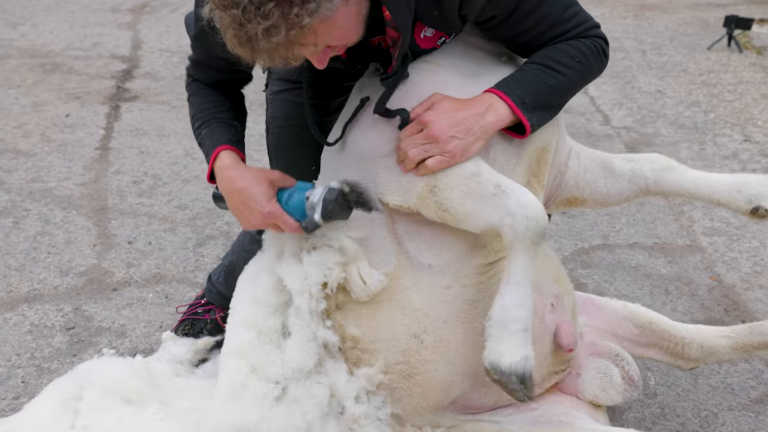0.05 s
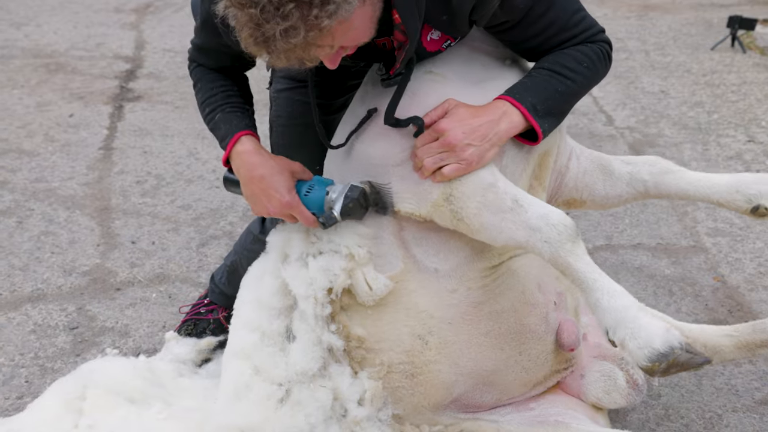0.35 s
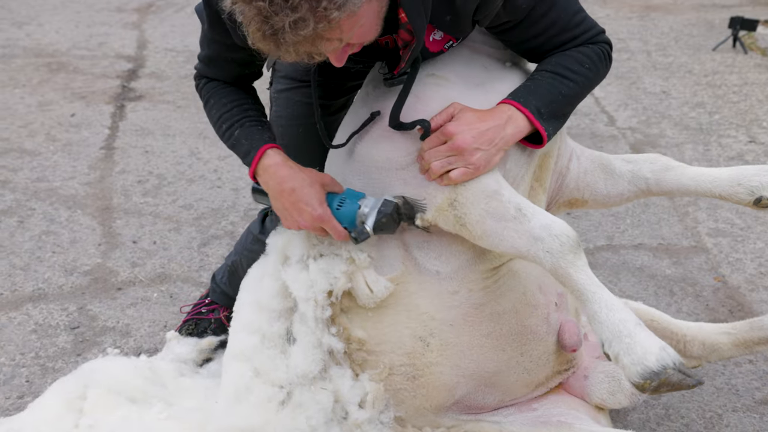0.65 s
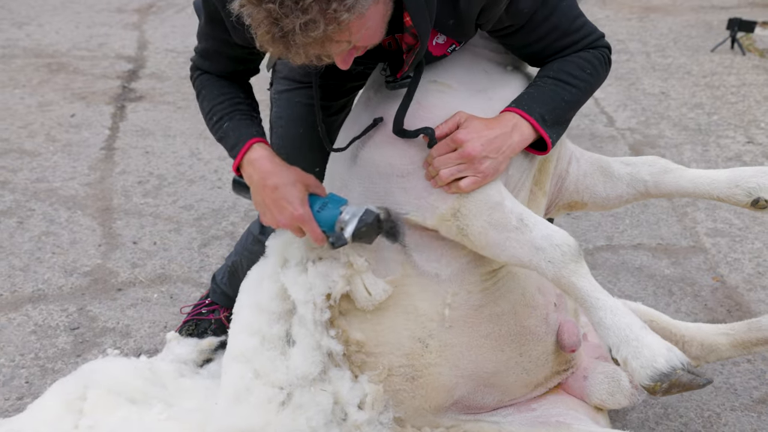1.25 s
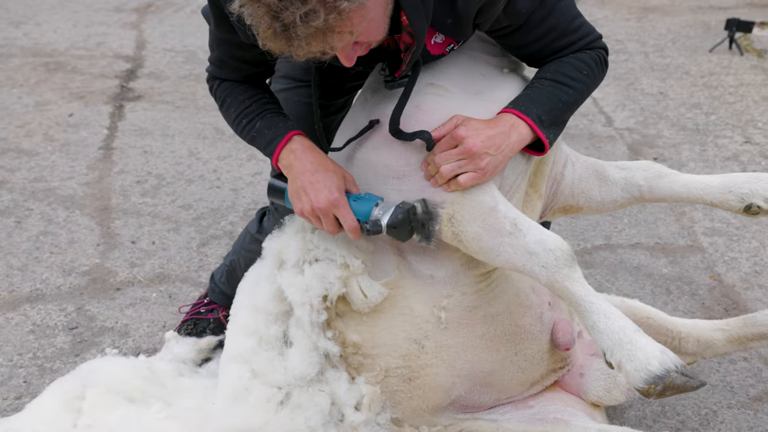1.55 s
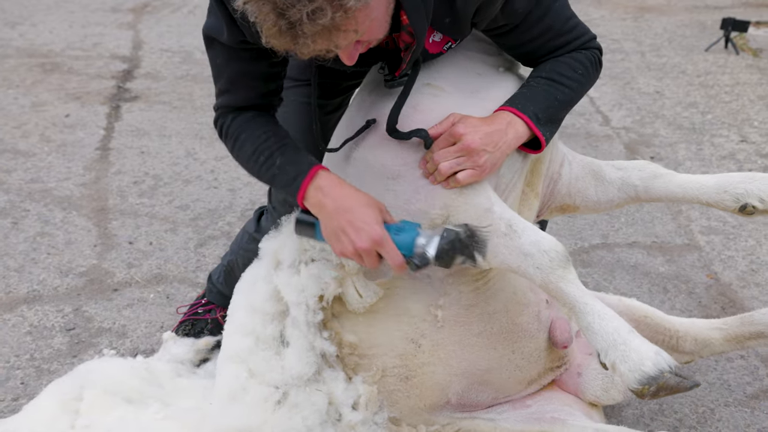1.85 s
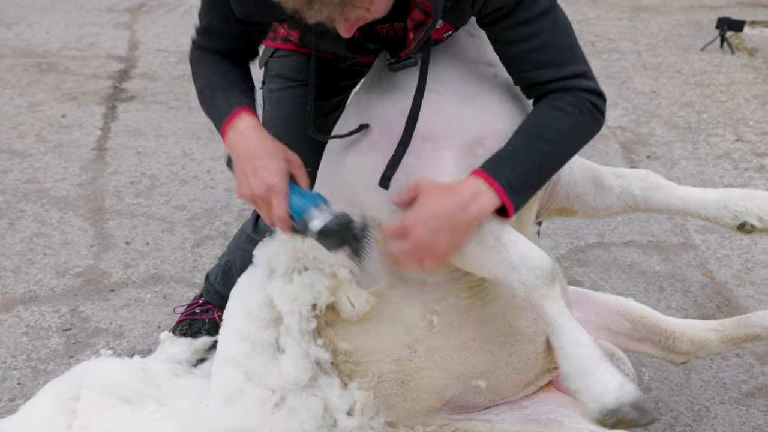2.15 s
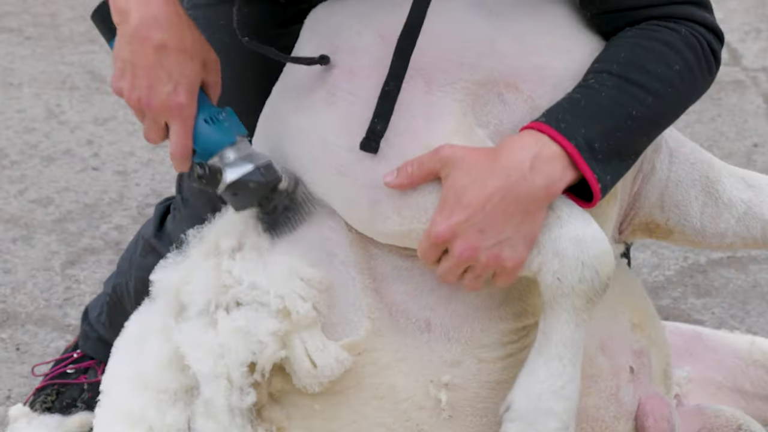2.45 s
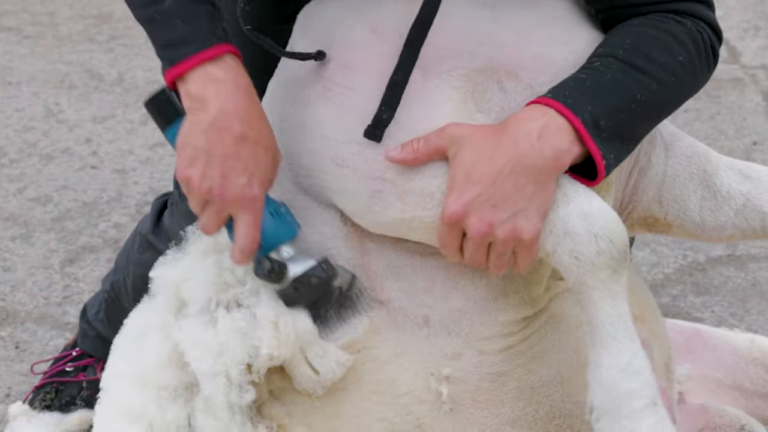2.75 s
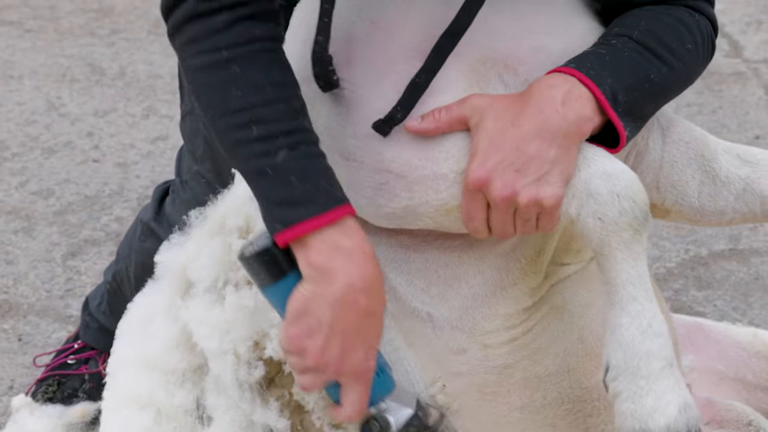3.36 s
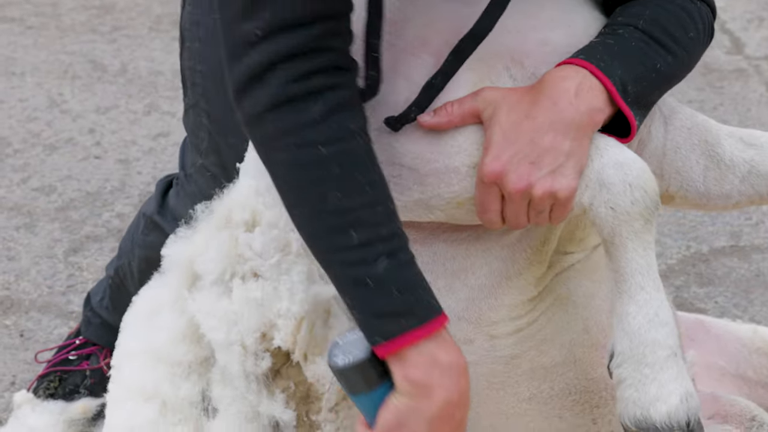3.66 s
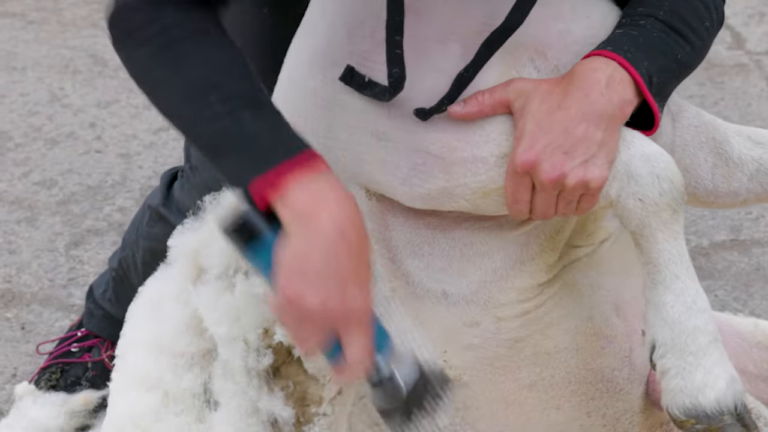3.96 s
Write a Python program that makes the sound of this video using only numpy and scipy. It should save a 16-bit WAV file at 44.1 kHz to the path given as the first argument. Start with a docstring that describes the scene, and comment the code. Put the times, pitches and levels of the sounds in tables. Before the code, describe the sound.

Close-up electric shears run continuously through a sheep's wool, with a fast rattle, a hissing rasp and a wavering whine over faint open air. Near the end the buzz turns duller and quieter in thick fleece.

```python
"""Outdoors on paving, one microphone close to electric clippers shearing a sheep.
The cutter swings to and fro about 39 times a second: it knocks the housing and clicks at each turn, and
rasps over the comb in between, snipping wool, while the gears whine. The animal shifts with soft thuds
over faint open air. Late on the cutter sinks into thick fleece, which muffles it and slows the motor."""
import sys
import numpy as np
from scipy import signal
from scipy.fft import rfft, irfft
from scipy.io import wavfile
from scipy.ndimage import map_coordinates

SR = 44100
rng = np.random.default_rng(int(sys.argv[2]) if len(sys.argv) > 2 else 0)


def wav_out(sig):
    """Save sig, one row per channel (or a flat mono array), as 16-bit PCM at SR to the path in sys.argv[1]."""
    wavfile.write(sys.argv[1], SR, np.round(np.clip(np.atleast_2d(sig).T, -1, 1) * 32767).astype(np.int16))


N = 176400
TIME = np.arange(N) / SR

# motor speed: (time [s], stroke rate [Hz])
STROKE_RATE = [(0.0, 39.15), (0.2, 39.18), (0.6, 39.27), (1.0, 39.14), (1.3, 39.46), (1.65, 38.95),
               (2.05, 39.23), (2.35, 39.2), (2.8, 38.93), (3.0, 38.42), (3.3, 38.12), (3.5, 37.86),
               (3.64, 37.6), (3.8, 39.56), (4.0, 39.53)]
# the cutter's two turns: (place in the stroke [0-1], push on the housing [relative], click trim [dB])
CUTTER_TURNS = [(.175, 1.0, -1.5), (.67, -.45, 0.5)]


def from_db(db):
    """Decibels to gain."""
    return 10 ** (np.asarray(db) / 20)


def rms_one(x):
    """Scale to unit rms."""
    return x / np.sqrt(np.mean(x ** 2) + 1e-20)


def in_time(rows):
    """Read a (time, value) curve at every sample."""
    return np.interp(TIME, *np.transpose(rows))


def at_hz(points, hz):
    """Read a spectrum on a log-frequency axis."""
    f, value = np.transpose(points)
    return np.interp(np.log(hz), np.log(f), value)


def drift(rate_hz):
    """A smooth random wander of about unit rms, mostly slower than rate_hz."""
    hop, settle = 40, 2000
    r = np.exp(-2 * np.pi * rate_hz * hop / SR)
    slow = signal.lfilter([1], [1, -2 * r, r * r], rng.standard_normal(N // hop + settle + 2))[settle:]
    return np.interp(np.arange(N) / hop, np.arange(len(slow)), rms_one(slow))


def stroke_gains(spread_db):
    """Random gains, more than enough for one a stroke."""
    return from_db(spread_db * rng.standard_normal(N // 100))


def resonate(x, hz, width_hz):
    """A resonance with gain 1 at its peak."""
    r = np.exp(-np.pi * width_hz / SR)
    poles = [1, -2 * r * np.cos(2 * np.pi * hz / SR), r * r]
    return signal.lfilter(np.array([1, 0, -1]) * (1 - r * r) / 2, poles, x)


def ring(drive, hz, width_hz):
    """The same resonance twice over, for steeper sides, at unit rms."""
    return rms_one(resonate(resonate(drive, hz, width_hz), hz, width_hz))


def around(s, spread_s):
    """A bell-shaped rise and fall around a moment."""
    return np.exp(-((TIME - s) / spread_s) ** 2 / 2)


def swell(drive, s, spread_s, hz, width_hz, db):
    """A resonance that fades in and out around a moment."""
    return from_db(db) * around(s, spread_s) * ring(drive, hz, width_hz)


def housing_knocks(strokes):
    """The cutter pushes the housing one way, then the other; its modes ring and the whole tool shakes."""
    # housing modes: (frequency [Hz], width [Hz], trim [dB], level curve [0 low, 1 middle, 2 upper])
    modes = [(236, 110, -25.5, 2), (269, 53, -18.5, 0), (344, 29, -5, 0), (414.3, 48, -1.5, 1),
             (493.6, 138, -4.5, 2), (880, 54, -11.5, 2)]
    # the housing's ring, changing as the wool presses on it: (time [s], level [dB])
    low = [(0.0, -52), (0.54, -47.5), (0.91, -41), (1.15, -46), (1.47, -41.5), (1.93, -44), (3.44, -43.5),
           (3.84, -51), (4.0, -46)]
    middle = [(0.0, -51), (0.59, -53), (0.93, -47), (2.08, -46), (2.14, -40.5), (2.73, -45), (3.58, -64.5),
              (3.62, -71), (3.75, -47.5), (4.0, -46.5)]
    upper = [(0.0, -41.5), (1.44, -44), (2.06, -47), (2.15, -45.5), (3.05, -45.5), (3.8, -56.5),
             (3.95, -46), (4.0, -47)]
    # shaking at the stroke rate: (time [s], level [dB])
    shake = [(0.0, -76), (0.36, -67), (1.7, -67), (2.17, -87), (2.28, -71), (3.14, -83), (4.0, -87)]
    low_hz, high_hz = 192, 584
    pushes = np.zeros(N + 1)
    for place, push, _ in CUTTER_TURNS:
        turns = np.arange(int(strokes[-1] - place) + 1) + place
        times = np.interp(turns, strokes, TIME)
        pushes[(times * SR).astype(int)] += push * stroke_gains(spread_db=.67)[:len(times)]
    pushes = signal.sosfilt(signal.butter(2, low_hz, "high", fs=SR, output="sos"), pushes[:N] + 1e-18)
    pushes = signal.sosfilt(signal.butter(4, high_hz, fs=SR, output="sos"), pushes)
    out = from_db(in_time(shake)) * rms_one(np.sin(2 * np.pi * strokes))
    for hz, width, db, curve in modes:
        level = in_time((low, middle, upper)[curve])
        out += from_db(level + db) * rms_one(resonate(pushes, hz, width))
    return out


def gear_whine(strokes):
    """Rough gear and motor tones, locked to the stroke and swelling with the load on each swing."""
    # three gear tones, then the motor's overtone: (multiple of the stroke rate, trim [dB], place of the
    # swell [0-1], swell depth [0-1], lopsidedness [0-1], phase wobble [rad], roughness [0-1])
    tones = [(37, -3.5, 0.95, 0.8, 0.4, 0.28, 0.12), (52, -3, 0.87, 0.75, 0.0, 0.38, 0.25),
             (104, 0, 0.84, 0.5, 0.45, 0.45, 0.28), (23, 2, .7, .5, .5, .2, .15)]
    # strength of those four tones: (time [s], level [dB])
    low = [(0.0, -42.5), (0.15, -37.5), (.55, -38.5), (1.01, -46.5), (1.301, -38.5), (1.7, -41), (1.8, -49),
           (2.04, -46.5), (2.27, -39), (2.8, -45), (3.44, -52.5), (4.0, -46)]
    middle = [(0.0, -38.5), (0.62, -35), (0.75, -38.5), (1.54, -35), (1.95, -44), (2.03, -35), (2.08, -47),
              (2.33, -33.5), (2.5, -39), (2.75, -64), (3.13, -43.5), (3.5, -56), (3.72, -43), (3.84, -62),
              (4.0, -40.5)]
    high = [(0, -39), (.06, -53), (.15, -34.5), (.24, -46), (.5, -51), (.68, -43), (.86, -37.5),
            (1.02, -45), (1.12, -39), (1.27, -50), (1.42, -35), (1.6, -35.5), (1.78, -45), (1.97, -43.5),
            (2.08, -45), (2.15, -34.5), (2.26, -45), (2.4, -37), (2.56, -44), (2.7, -48), (2.86, -40.5),
            (3.22, -48.5), (3.33, -63), (3.55, -54), (3.74, -53), (3.86, -45), (4, -42.5)]
    motor = [(0, -62), (2.0, -57), (2.35, -51), (2.9, -53), (3.3, -58), (4, -60)]
    wobble_hz, chatter_hz = 16, 40
    out = 0
    for row, level in zip(tones, (low, middle, high, motor)):
        multiple, db, place, depth, lopsided, wobble, rough = row
        angle = 2 * np.pi * (strokes - place)
        load = 1 + depth * np.cos(2 * angle) + lopsided * np.cos(angle)
        mesh = 2 * np.pi * multiple * strokes + wobble * drift(wobble_hz)
        tone = np.sin(mesh) * (1 + rough * drift(chatter_hz))
        tone += np.cos(mesh) * rough * drift(chatter_hz)
        out += from_db(in_time(level) + db) * rms_one(load * tone)
    return out


def blade_force(strokes):
    """Force between the blades: sliding friction and a sharp click at each turn."""
    # blade friction: (place in the stroke [0-1], relative level [dB])
    friction = [(0, -3), (.1, -7), (.18, 2), (.3, 0), (.41, 2), (.52, -.5), (.62, -3.5), (.7, 3),
                (.85, 1.5)]
    click_db, click_decay_s, lead_strokes = 7.5, .00041, .034
    wander_db = .42 * drift(rate_hz=23)
    force = from_db(np.interp(strokes, *np.transpose(friction), period=1) + wander_db)
    for place, _, db in CUTTER_TURNS:
        count, since = np.divmod(strokes - place + lead_strokes + 1, 1)
        strength = from_db(click_db + db) * stroke_gains(spread_db=1.6)[count.astype(int)]
        force += strength * np.exp(-since / in_time(STROKE_RATE) / click_decay_s)
    return rms_one(force)


def scrape(strokes, force):
    """Two kinds of grit: the steel's roughness, met on every stroke, and fresh hiss with snipped fibres."""
    snips_per_s, snip_spread_db, snip_db = 2500, 2.5, -10
    surface = irfft(np.exp(2j * np.pi * rng.random(N // 300)))
    repeated = map_coordinates(surface, [strokes % 1 * len(surface)], order=3, mode="grid-wrap")
    snips = (rng.random(N) < snips_per_s / SR) * rng.choice([-1, 1], N)
    sizes = from_db(snip_spread_db * np.minimum(rng.exponential(1, N), 6))
    fresh = rng.standard_normal(N) + from_db(snip_db) * rms_one(snips * sizes)
    return rms_one(force * repeated), rms_one(force * fresh)


def blade_rasp(strokes, force):
    """The cutter rasps over the comb, shaded band by band by the wool around it."""
    # six ranges of the rasp: (centre [Hz], trim [dB], share that repeats on every stroke [0-1])
    ranges = [(597, 3, 0.53), (986, -1, 0.46), (2870, 0, 0.49), (5703, 0.5, 0.22), (10130, 0.5, 0.31),
              (13200, 3, 0.11)]
    # strength of the ranges, the first two both following low: (time [s], relative level [dB])
    low = [(0, -45), (.4, -47), (.86, -45.5), (1.1, -47.5), (1.55, -45.5), (1.83, -45.5), (2.02, -50),
           (2.24, -46.5), (2.801, -49.5), (3.15, -50.5), (3.55, -52), (3.75, -53), (4, -58)]
    middle = [(0, -36), (.27, -34.5), (.7, -34.5), (1.04, -36), (1.3, -35.5), (1.8, -35), (2.04, -40.5),
              (2.12, -33.5), (2.3, -36), (2.42, -37.5), (2.6, -35), (2.85, -43.5), (3.35, -42.5),
              (3.6, -45), (3.8, -47), (4, -43.5)]
    high = [(0, -37), (.15, -34), (.5, -34.5), (.75, -37), (1.02, -38.5), (1.2, -36.5), (1.6, -39),
            (1.98, -42), (2.25, -39), (2.55, -40.5), (2.95, -42.5), (3.35, -48), (3.59, -49.5),
            (3.77, -54.5), (4, -43)]
    top = [(0, -39), (.06, -38.5), (.35, -36.5), (.6, -40.5), (.95, -46), (1.3, -41), (1.7, -45), (2, -50),
           (2.25, -40), (2.6, -46.5), (2.75, -45), (3.1, -54), (3.58, -53), (3.77, -58), (4, -52)]
    sizzle = [(0.0, -48), (0.02, -42), (0.18, -41), (0.73, -52), (1.1, -52), (1.11, -47), (1.75, -52),
              (1.99, -55), (2.16, -50), (2.22, -41), (2.64, -56.5), (3.12, -61.5), (3.63, -63), (3.72, -68),
              (3.9, -63), (4.0, -51)]
    # steady colour of the rasp: (frequency [Hz], relative density [dB])
    colour = [(130, -24), (200, -7.5), (300, -11), (500, 1.5), (700, -3), (920, 5), (1150, 1), (1400, -0.5),
              (1700, 0.8), (2050, -2), (2400, -2.5), (2950, -4), (3500, -5.5), (4400, -3.5), (5200, -7),
              (6000, -3.5), (6800, -8), (7800, -3.5), (10000, -8), (13000, -5.5), (15500, -9.5)]
    grit = [scrape(strokes, force) for _ in range(2)]  # neighbouring bands get different grit
    centres, trims, shares = np.transpose(ranges)
    levels = np.array([in_time(c) for c in (low, low, middle, high, top, sizzle)]) + trims[:, None]
    edges = np.r_[np.geomspace(130, 1000, 7)[:-1], np.geomspace(1000, 16500, 21)]
    out = 0
    for k, (low_hz, high_hz) in enumerate(zip(edges, edges[1:])):
        hz = np.sqrt(low_hz * high_hz)
        weights = np.array([np.interp(np.log(hz), np.log(centres), row) for row in np.eye(len(centres))])
        share = np.clip(weights @ shares, 0, 1)
        repeated, fresh = grit[k % 2]
        blend = np.sqrt(share) * repeated + np.sqrt(1 - share) * fresh
        band = signal.sosfilt(signal.butter(2, [low_hz, high_hz], "band", fs=SR, output="sos"), blend)
        width_gain = np.sqrt((high_hz - low_hz) / 650)
        flicker_db = .9 * drift(rate_hz=3.9)
        out += rms_one(band) * width_gain * from_db(weights @ levels + at_hz(colour, hz) + flicker_db)
    return out


def wool_hollows(rasp):
    """Valleys between the blade resonances open and close as the tool turns in the wool."""
    # dips in the rasp: (time [s], spread [s], frequency [Hz], width [Hz], depth [0-1])
    valleys = [(.1, 0.23, 850, 300, 0.7), (0.16, .2, 2360, 190, .85), (0.23, 0.38, 4300, 1100, 0.45),
               (0.74, 0.28, 2250, 320, 0.46), (3.4, 0.16, 3400, 450, 0.7), (3.4, 0.62, 710, 270, 0.64),
               (3.7, .2, 1200, 160, .5), (6.3, 0.19, 2200, 180, 0.3), (2.82, .1, 6200, 1500, 0.7)]
    for s, spread_s, hz, width, depth in valleys:
        rasp = rasp - depth * around(s, spread_s) * resonate(rasp, hz, width)
    return rasp


def comb_rings(strokes, force):
    """The scraped comb rings as its pressure on the skin changes."""
    # passing resonances: (time [s], spread [s], frequency [Hz], width [Hz], level [dB])
    resonances = [(0.066, 0.14, 2560, 110, -39), (.12, 0.12, 2800, 250, -40),
                  (0.296, 0.17, 1393, 40, -40.5), (.4, 0.23, 2115, 70, -46), (0.6, 0.3, 4540, 404, -36.5),
                  (1.19, 0.071, 2860, 220, -39.5), (1.51, 0.32, 4800, 706, -39),
                  (2.3, 0.17, 2470, 503, -39), (2.6, 0.23, 2247, 201, -40), (2.6, 0.54, 6140, 350, -55),
                  (3.19, 0.62, 1263, 71, -51.5), (3.5, 0.32, 2690, 400, -48.5),
                  (3.554, .12, 4340, 500, -50), (3.9, 0.11, 4300, 350, -48.5)]
    drive = sum(scrape(strokes, force))
    return sum(swell(drive, *row) for row in resonances)


def cutter_strike(strokes, place, decay_s):
    """The loose cutter strikes once a stroke: a short, hard burst that rings the steel."""
    # modes of the struck blades: (frequency [Hz], width [Hz], relative level [dB])
    steel = [(1503, 470, -6.5), (2190, 660, -2.5), (2834, 440, 1.5), (3650, 1130, -6)]
    count, since = np.divmod(strokes - place + 1, 1)
    strength = stroke_gains(spread_db=1.0)[count.astype(int)]
    repeated, fresh = scrape(strokes, strength * np.exp(-since / in_time(STROKE_RATE) / decay_s))
    burst = repeated + .5 * fresh
    return rms_one(sum(from_db(db) * ring(burst, hz, width) for hz, width, db in steel))


def cutter_rattle(strokes):
    """Hard clacks at both turns under load, and a lighter tick in mid-swing."""
    # the two clacks: (place in the stroke [0-1], decay [s], relative level [dB])
    strikes = [(.2, .0012, -3.5), (.672, .002, 0)]
    # strength of the clacks and of the tick: (time [s], level [dB])
    clack_level = [(0, -45), (1.0, -52), (1.35, -47), (1.55, -41.5), (2.05, -49.5), (2.2, -42),
                   (2.6, -40.5), (2.85, -48.5), (4, -67)]
    tick_level = [(0, -42), (.25, -42), (.45, -55), (1.6, -55), (1.95, -53), (2.3, -58), (3.1, -48),
                  (3.35, -54), (4, -54)]
    clacks = sum(from_db(db) * cutter_strike(strokes, place, decay_s) for place, decay_s, db in strikes)
    tick = cutter_strike(strokes, place=.395, decay_s=.0008)
    return from_db(in_time(clack_level)) * rms_one(clacks) + from_db(in_time(tick_level)) * tick


def open_air(level_db=-64.5):
    """Faint, steady outdoor background, mostly low rumble."""
    # background colour: (frequency [Hz], relative density [dB])
    colour = [(25, -16), (60, -6), (85, 0), (130, -5), (200, -14), (500, -6), (2000, -12), (15000, -20)]
    hz = np.maximum(np.arange(N // 2 + 1) * SR / N, 1)
    spectrum = rfft(rng.standard_normal(N)) * from_db(at_hz(colour, hz))
    return from_db(level_db) * rms_one(irfft(spectrum, N))


def sheep_bumps(width_hz=83):
    """Dull, soft thuds as the animal shifts."""
    # bumps of its body: (time [s], spread [s], frequency [Hz], level [dB])
    thuds = [(0.136, 0.07, 108, -60), (1.35, 0.017, 200, -53)]
    return sum(swell(rng.standard_normal(N), s, spread_s, hz, width_hz, db)
               for s, spread_s, hz, db in thuds)


def scene():
    """One motor drives knocks, gears and blades; the sheep and the air lie under them, in mono."""
    strokes = np.cumsum(in_time(STROKE_RATE)) / SR  # running count; its fraction is the place in a stroke
    handpiece = housing_knocks(strokes) + gear_whine(strokes)
    force = blade_force(strokes)
    blades = wool_hollows(blade_rasp(strokes, force)) + comb_rings(strokes, force)
    return (handpiece + blades + cutter_rattle(strokes) + sheep_bumps() + open_air())[None]


def record(dry):
    """The microphone signal, with its top cut steeply."""
    cutoff_hz = 15900
    return signal.sosfilt(signal.ellip(12, .1, 80, cutoff_hz, fs=SR, output="sos"), dry)


dry = scene()
out = record(dry)
wav_out(out)
```